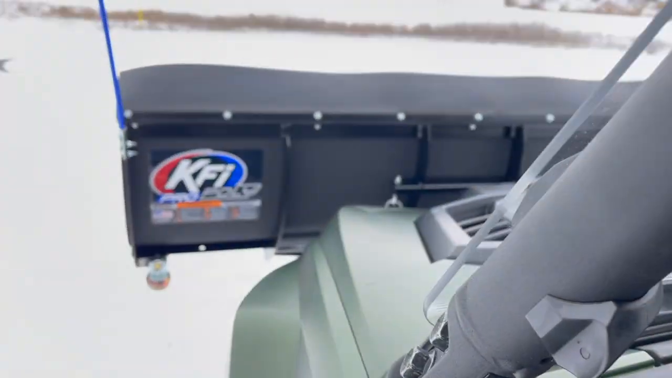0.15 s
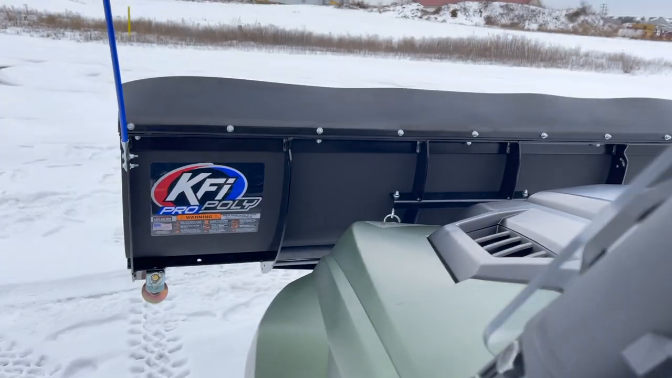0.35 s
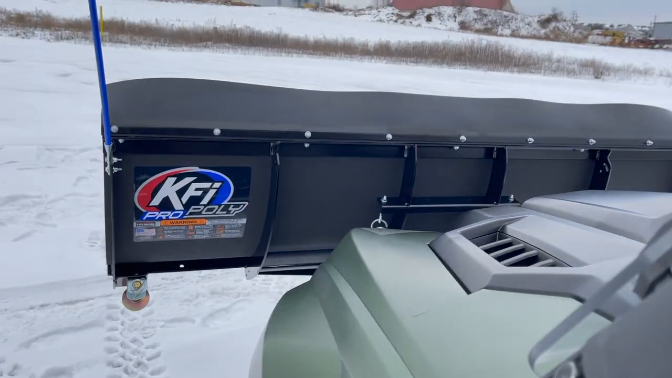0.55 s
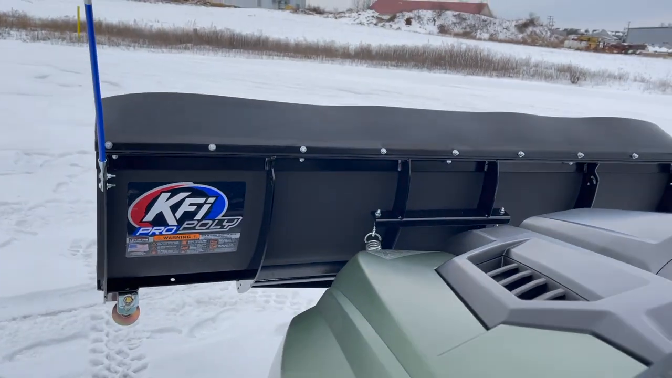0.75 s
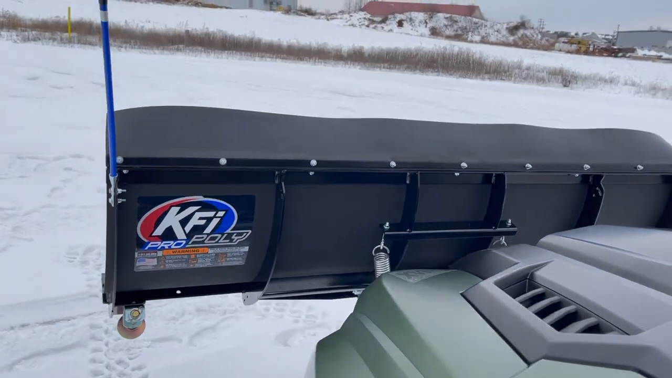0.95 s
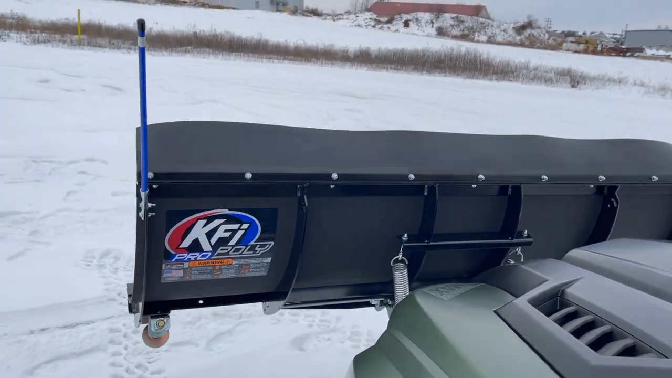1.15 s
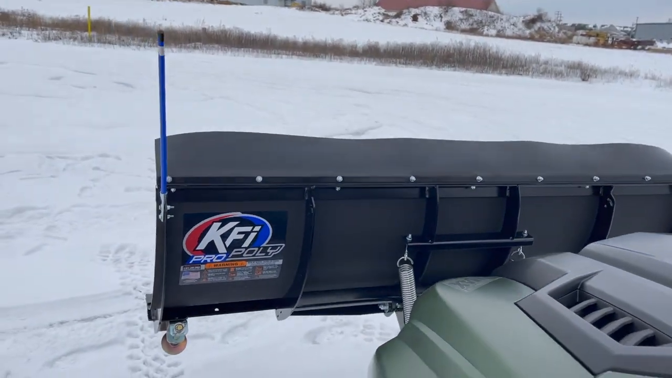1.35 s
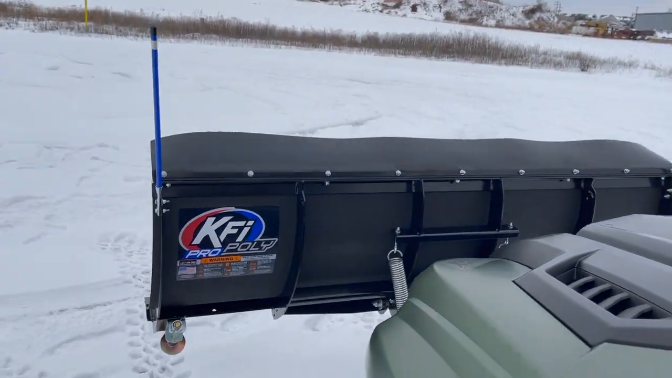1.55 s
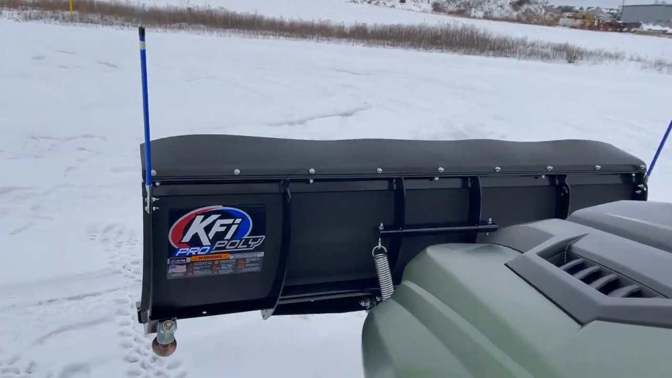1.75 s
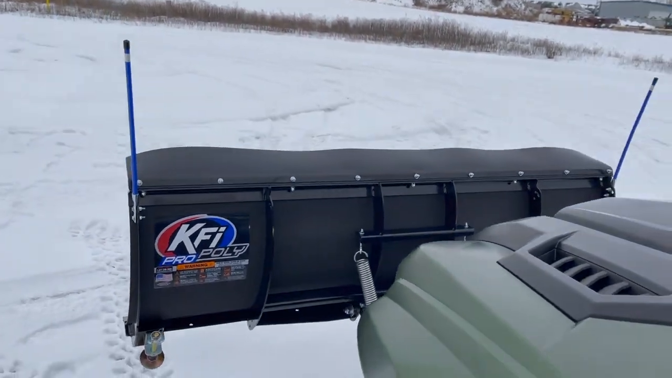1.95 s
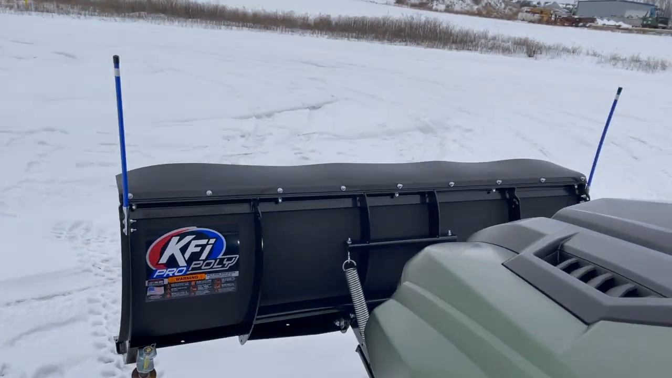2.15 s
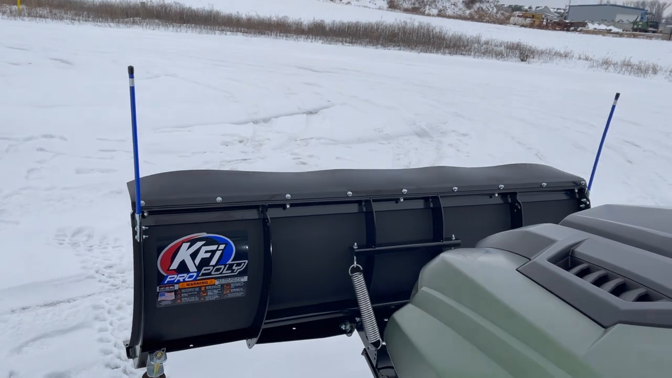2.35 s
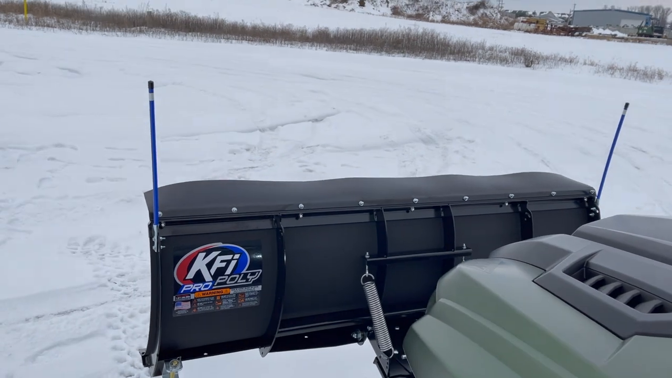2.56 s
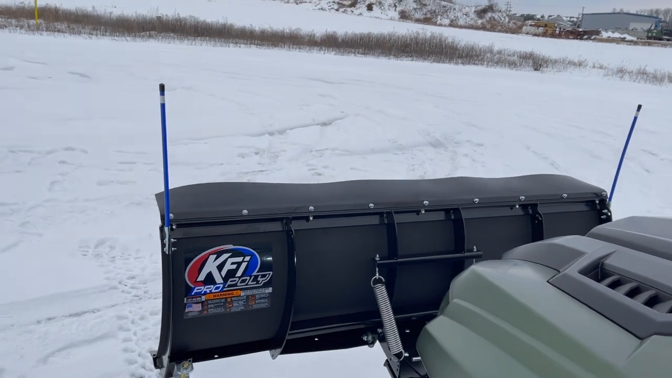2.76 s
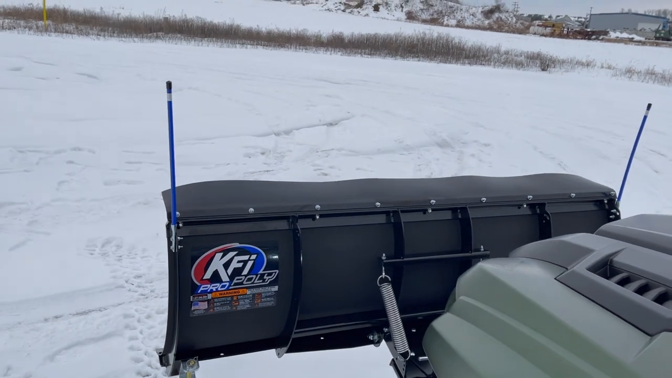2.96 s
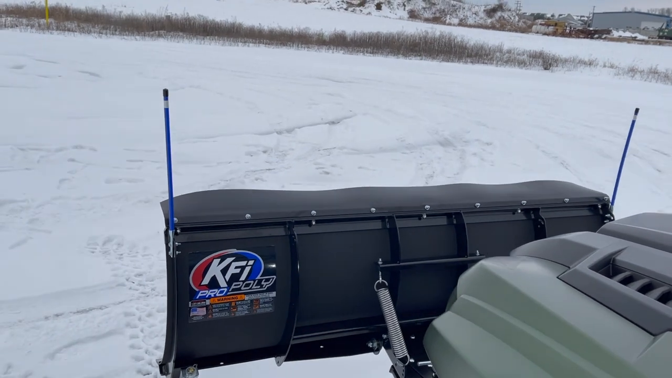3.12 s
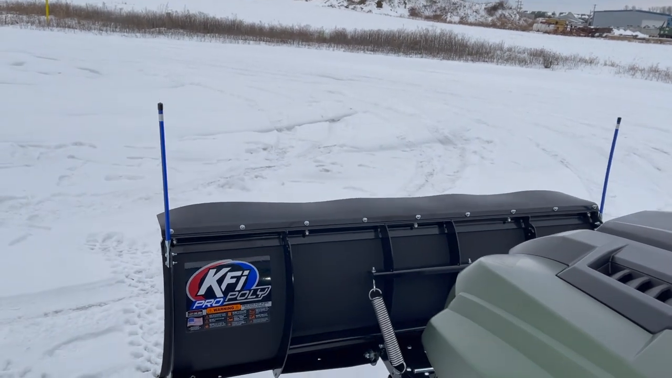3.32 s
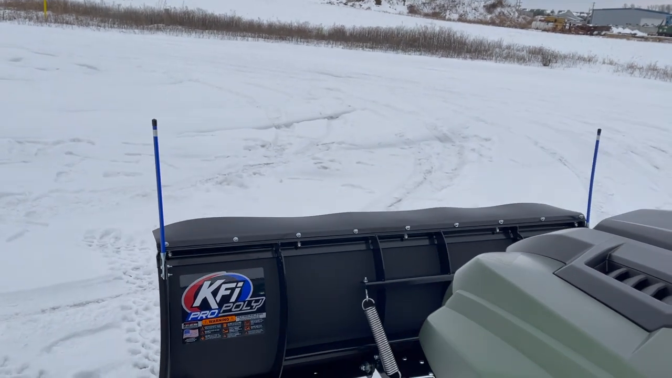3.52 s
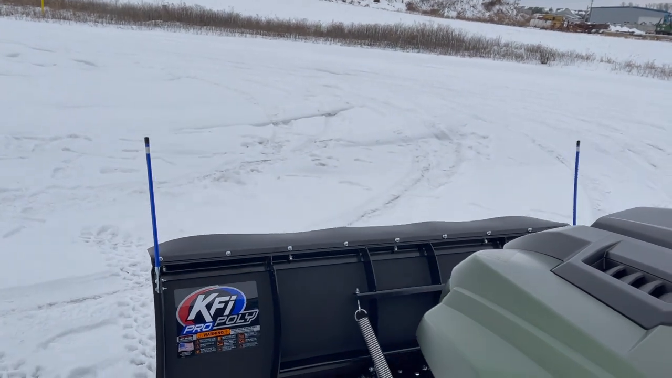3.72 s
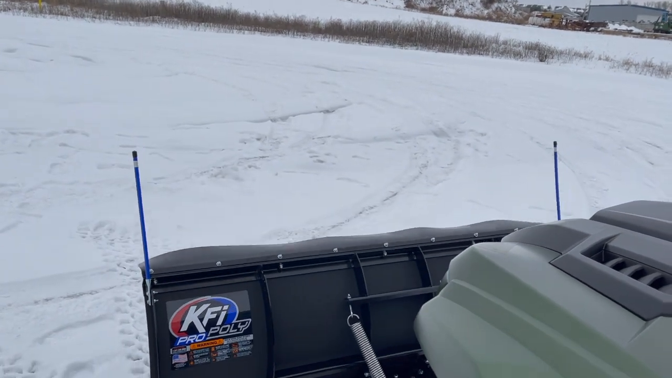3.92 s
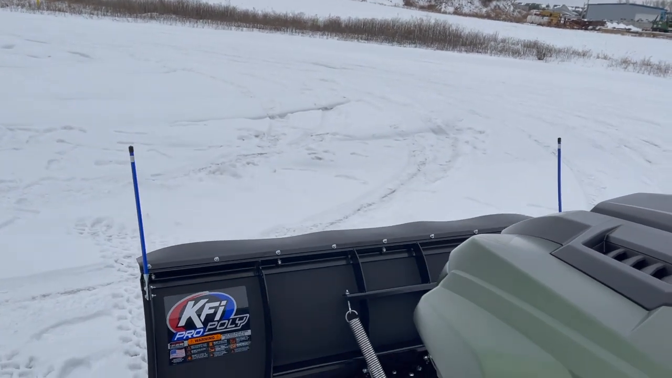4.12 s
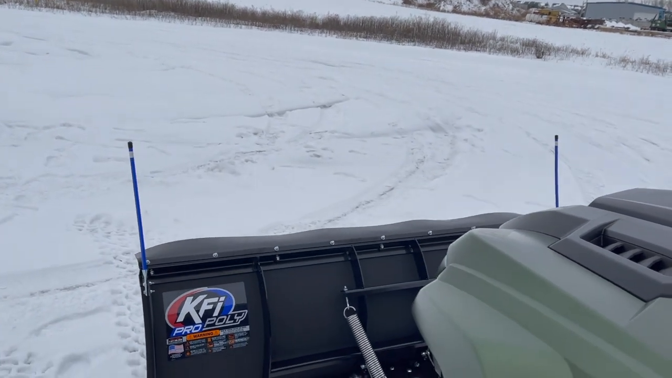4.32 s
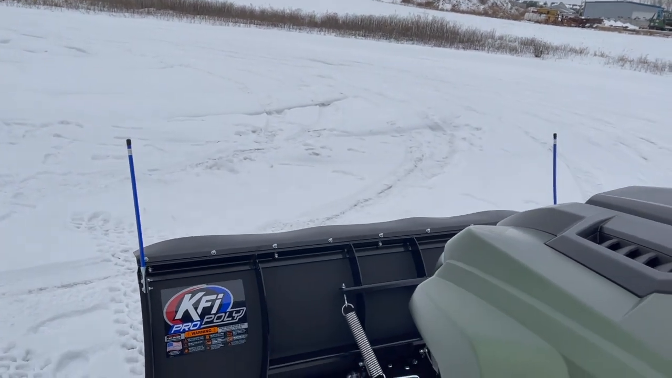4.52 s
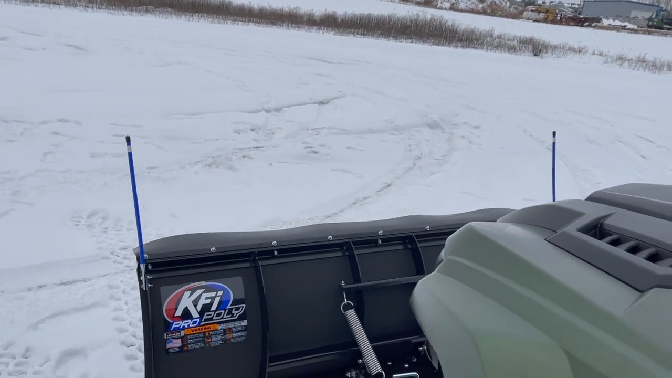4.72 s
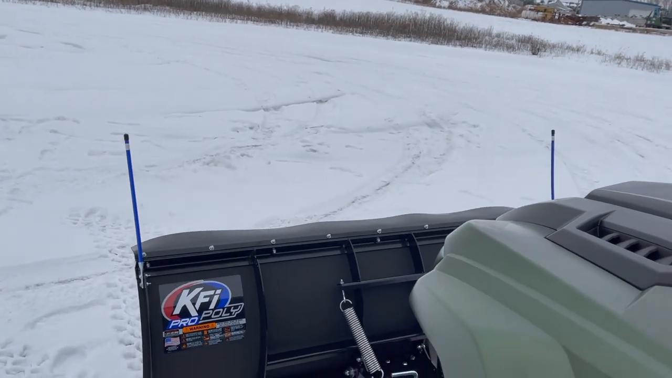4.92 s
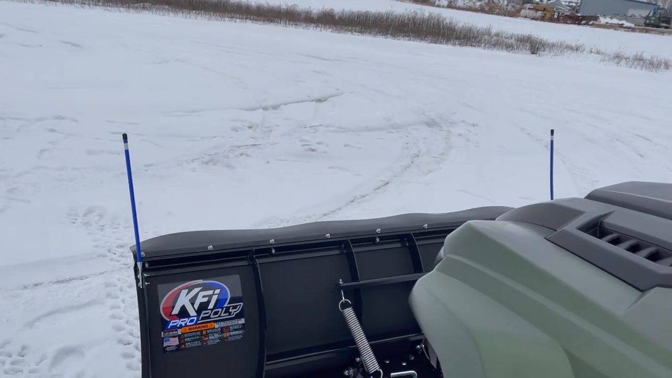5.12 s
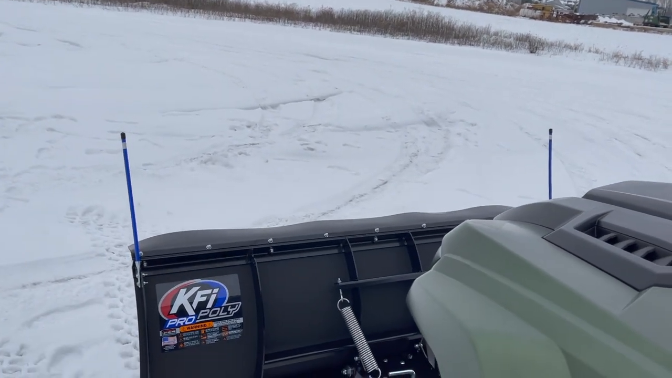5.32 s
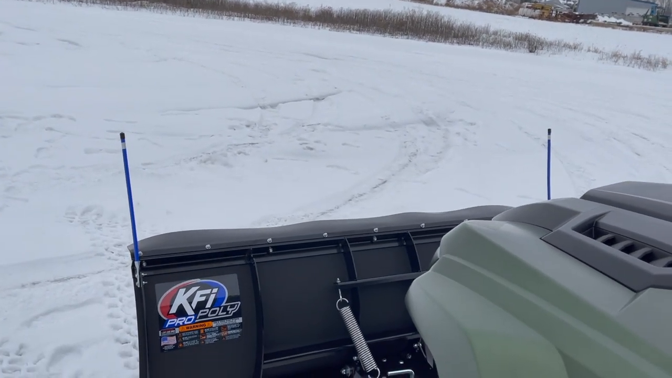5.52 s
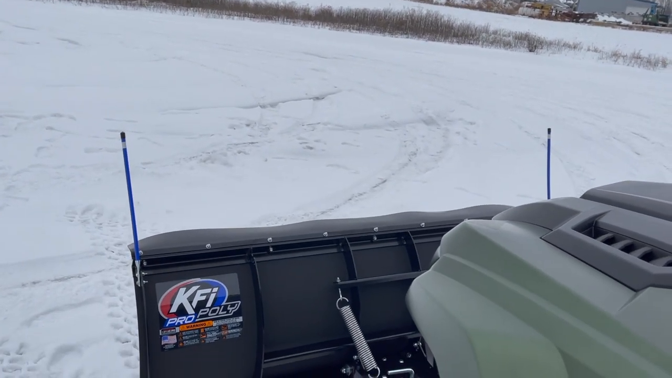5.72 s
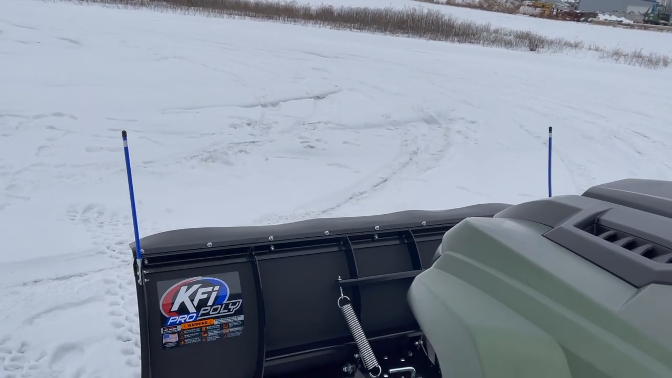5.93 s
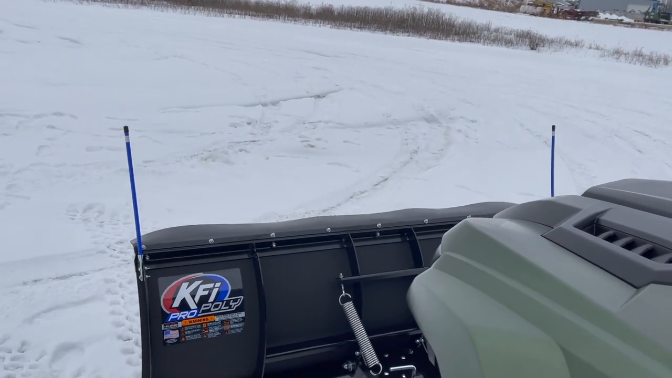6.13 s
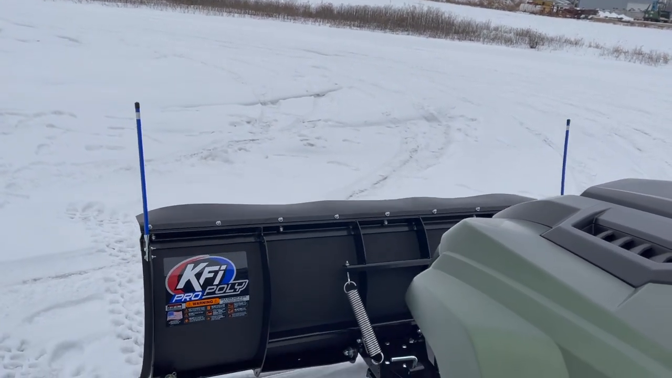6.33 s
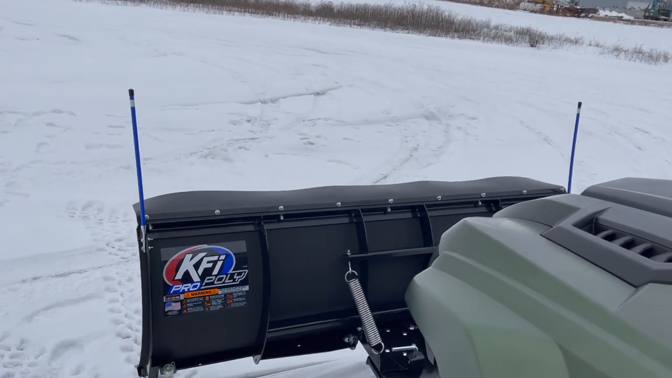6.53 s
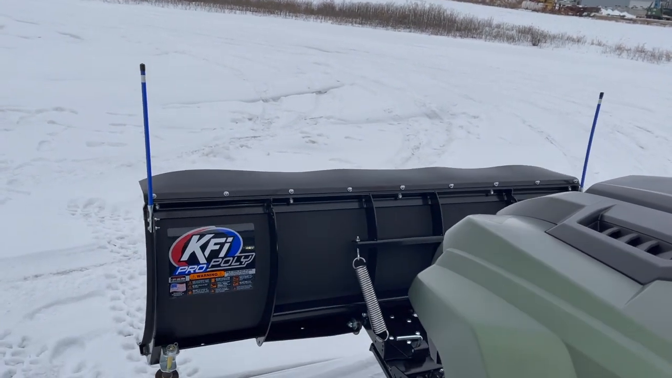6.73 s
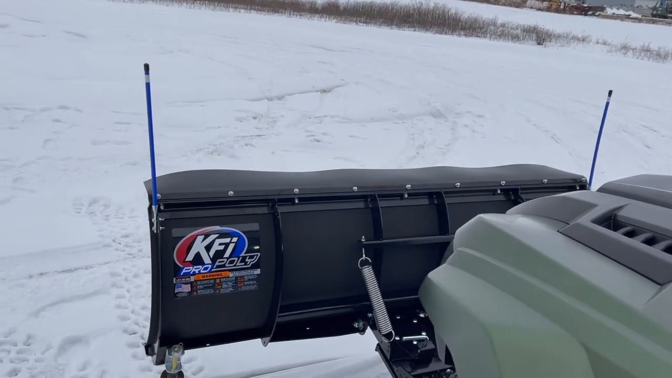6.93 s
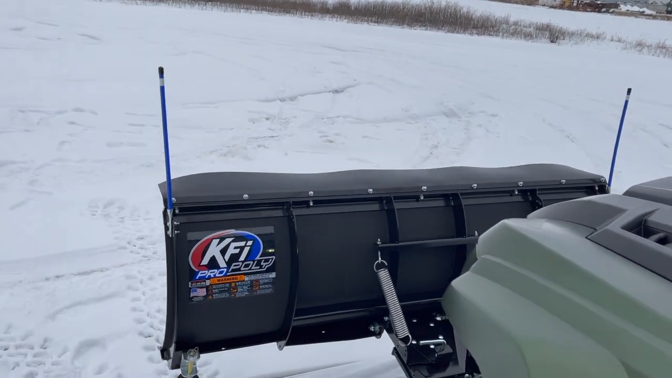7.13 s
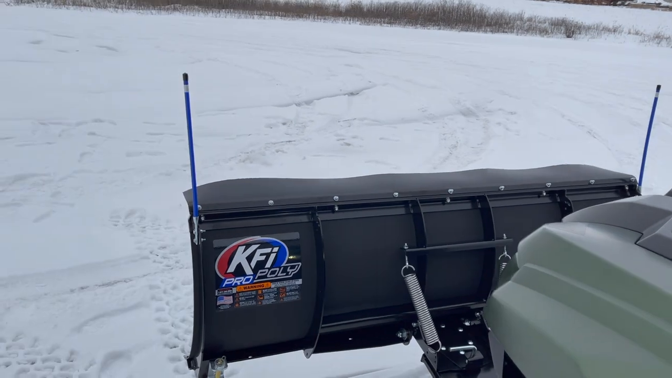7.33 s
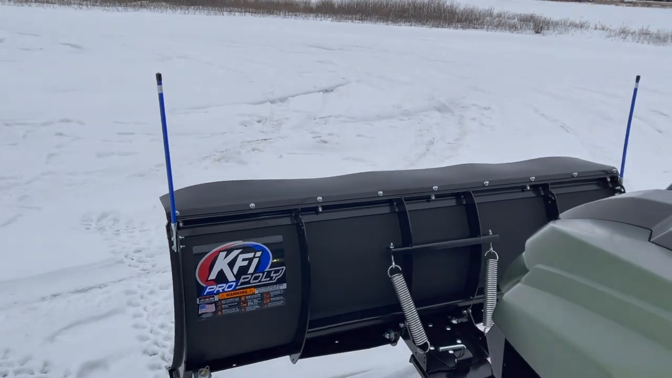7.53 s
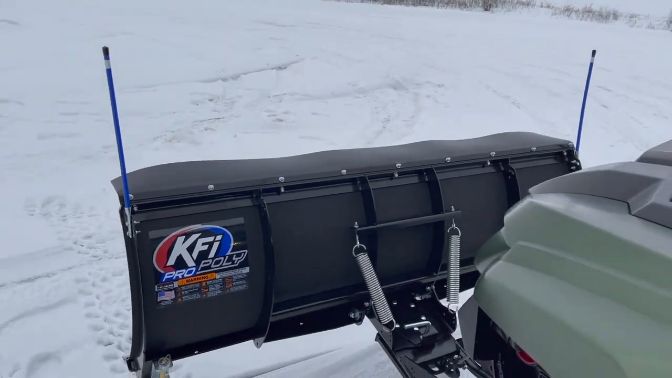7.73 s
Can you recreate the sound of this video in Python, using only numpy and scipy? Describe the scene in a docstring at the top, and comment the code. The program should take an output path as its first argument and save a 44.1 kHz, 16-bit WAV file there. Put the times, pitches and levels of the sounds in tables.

```python
"""Clacks, a whining and grinding winch and heavy bangs: an electric winch on a utility vehicle lowers
a snow plow in two bursts, then lifts it, heard from the cab. The motor is sine orders of its shaft and
gear mesh over modulated noise; the blade is noise bursts ringing steel modes; the coil springs are
slowly decaying sines and noise. Swaying scrapes follow; a rustling jacket and light wind lie underneath."""
import sys
import numpy as np
from scipy import signal
from scipy.fft import rfft, irfft, next_fast_len
from scipy.io import wavfile
from scipy.ndimage import uniform_filter1d, map_coordinates

SR = 44100
rng = np.random.default_rng(int(sys.argv[2]) if len(sys.argv) > 2 else 0)


def inscribe(sig):
    """Save sig as 16-bit PCM at rate SR to the path in sys.argv[1].

    A 1-D sig is mono; a 2-D sig holds one channel per row.
    Samples are clipped to [-1, 1] before scaling.
    """
    pcm = np.round(np.clip(np.atleast_2d(sig).T, -1, 1) * 32767)
    wavfile.write(sys.argv[1], SR, pcm.astype(np.int16))


N = 347067

# motor runs, two down and one up: [switch on t/s, switch off t/s, clack level/dB]
RUNS = [(1.068, 2.12, -20), (2.972, 3.808, -31), (5.991, 6.744, -24)]
MOTOR_LAG_S = 0.02  # switch-on to motor fed
SLOWING_PER_S = 6.2  # decay rate of speed after switch-off

# shaft orders, lowering: [multiple of shaft speed, level/dB]
ORDERS_DOWN = [(1, -39), (1.72, -41.5), (2, -52), (3, -45.5), (3.48, -45), (5.42, -46), (8.38, -47),
               (8.9, -47.5), (12, -49), (16.3, -51.5)]
# lowering runs: [full-speed whine f/Hz, whine level/dB, first swell t/s, fraying/(rad/s^2),
# hum and grinding level/dB, their growth/(dB/s)]
LOWERINGS = [(2286, -35, 1.353, .4, 1, -0.5), (2271, -42, 3.17, 10, -1, 1.5)]
LOWERING_SPEED_LACK, LOWERING_SPIN_UP_S = 0.48, 0.051  # share missing when fed, time constant
DRUM_HZ, SWELL_DB, WHINE_FADE_DB_PER_S = 2.66, 5, 6.5
SQUEAK_DB, SQUEAK_LAG_S, SQUEAK_HALF_WIDTH_S = 12.5, 0.016, 0.006  # as the brake bites


def lowering():
    """Unloaded motor runs up to a steady speed; its whine swells per drum turn, frays as the cable slackens."""
    out = np.zeros((2, N))
    for (on, off, _), row in zip(RUNS, LOWERINGS):
        full_hz, whine_db, swell_s, fray, grind_db, growth = row
        age = np.clip(clock() - on, 0, off - on)
        pace = speed(on, off, LOWERING_SPEED_LACK, LOWERING_SPIN_UP_S)
        whine = turning(full_hz * pace)
        shaft = whine / 28.3
        whine = whine + fray * age ** 2 * wobble(110)

        swell_db = SWELL_DB * np.cos(2 * np.pi * DRUM_HZ * (clock() - swell_s))
        swell_db -= WHINE_FADE_DB_PER_S * age
        swell_db += SQUEAK_DB * bump(off + SQUEAK_LAG_S, SQUEAK_HALF_WIDTH_S)
        partials = np.sin(whine + 0.205 * wobble(58))
        partials += amp(-25.0) * np.sin(2 * whine)
        partials += amp(-16.0) * np.sin(whine - shaft + wobble(27))  # shaft sideband
        tone = np.sqrt(2) * amp(whine_db + swell_db) * pace ** 4 * partials

        hum = pace ** 5 * lines(shaft, ORDERS_DOWN, slip=0.27, slip_rate=11, flutter_db=2.5)
        grind = grinding(on, shaft, growl_db=-2, hiss_db=4.5, throb=0.056, grain_db=1.0)
        rough = amp(grind_db + growth * age) * (hum + grind)
        out += powered(on, off, coast=0.052) * (tone + rough)
    return out


# shaft orders, lifting: [multiple of shaft speed, level/dB]
ORDERS_UP = [(1.5, -43), (2, -59), (3, -46.5), (5.33, -50), (6, -43.5), (7.8, -41), (8.22, -45),
             (9.75, -45.5), (13.3, -49), (15.6, -45.5)]
# overtones of the loaded gear mesh: [multiple of mesh rate, level/dB]
MESH_TONES = [(2, -39), (3, -41.5), (4, -53), (5, -51), (6, -47), (7, -47), (8, -51), (9, -52.5),
              (10, -51.5), (11, -56.5)]
# overtones that ring out in turn as the load shifts: [t/s, half width/s, multiple of mesh rate, level/dB]
OVERTONES = [(6.065, 0.014, 3, -35), (6.34, 0.19, 4, -43.5), (6.595, 0.042, 3, -37.5), (6.62, .05, 7, -47),
             (6.69, 0.034, 6, -42)]
LIFTING_SPEED_LACK, LIFTING_SPIN_UP_S = 0.27, 0.033  # share missing when fed, time constant
NOMINAL_MESH_HZ = 595
LOAD_S, LOAD_HALF_WIDTH_S, LOAD_SAG = 6.35, 0.091, 0.018  # cable takes the weight; sag as share of speed
RECOVERY_PER_S = 0.027  # speed share regained as the blade rises
SLACK_TONE_DB, LOADED_TONE_DB, BUZZ_DB = -53.5, -33.5, 0.5
GROWL_EASING_DB, TREBLE_EASING_DB = 5, 1  # drops under load; treble: buzz and hiss


def lifting():
    """Blade weight slows the motor; the rough mesh buzz gains a clean, slowly rising tone as the load settles."""
    on, off, _ = RUNS[-1]
    sag = LOAD_SAG * bump(LOAD_S, LOAD_HALF_WIDTH_S)
    recovery = RECOVERY_PER_S * np.maximum(clock() - LOAD_S, 0)
    pace = speed(on, off, LIFTING_SPEED_LACK, LIFTING_SPIN_UP_S) * (1 - sag + recovery)
    load = (1 + np.tanh((clock() - LOAD_S) / LOAD_HALF_WIDTH_S)) / 2
    mesh = turning(NOMINAL_MESH_HZ * pace)
    shaft = mesh / 8

    clean_db = SLACK_TONE_DB + load * (LOADED_TONE_DB - SLACK_TONE_DB)
    tone = sine(clean_db, 2 * mesh + 0.13 * wobble(62))
    overtones = sum(bump(s, width) * sine(db, k * mesh + 0.7 * wobble(80)) for s, width, k, db in OVERTONES)
    hum = lines(shaft, ORDERS_UP, slip=0.32, slip_rate=11, flutter_db=1.5)

    cable_tug = amp(0.99 * wobble(45))  # winding onto the drum
    eccentric = 1 + 0.3 * np.sin(shaft + wobble(30))  # teeth bite harder once a turn
    buzz = eccentric * lines(mesh, MESH_TONES, slip=1.3, slip_rate=150, flutter_db=3.5)
    buzz = amp(BUZZ_DB - TREBLE_EASING_DB * load) * pace ** 6 * buzz
    growl_db = -0.5 - GROWL_EASING_DB * load
    hiss_db = 3.5 - TREBLE_EASING_DB * load
    grind = grinding(on, shaft, growl_db, hiss_db, throb=0.051, grain_db=0.0)
    return powered(on, off, coast=0.013) * (tone + overtones + hum + cable_tug * (buzz + grind))


# winch noise colours: [f/Hz, spectral level/dB]
GROWL = [(45, -36.5), (100, 1), (200, 4), (320, -1), (450, 0.5), (580, -2), (750, -2), (1100, -3.5),
         (1500, -8), (2200, -20), (4000, -65)]
HISS = [(900, -24), (1800, 3.5), (2700, 1), (3300, -1.5), (4000, -3), (4600, -3.5), (5800, -2), (6600, -6),
        (8000, -7), (9500, -2.5), (11000, 3), (12100, -5.5), (12700, -23), (13600, -60)]
# winch housing resonances: [f/Hz, width/Hz, lift/dB]
HOUSING = [(677, 40, 5.3), (940, 9.2, 2.7), (2594, 150, 2.7), (2913, 160, 3.3), (3600, 140, 5.7),
           (4380, 130, 3.8)]
# grinding surges where the cable drags on the drum: [t/s, half width/s, level/dB]
SURGES = [(3.159, 0.029, 3.5), (3.49, .025, 2), (3.68, 0.069, 3), (6.27, 0.014, 0.5)]
GROWL_BASE_DB, HISS_BASE_DB = -27.5, -40
START_DB, BUILD_S = -3, 0.17  # offset at switch-on, its Gaussian recovery


def grinding(on, shaft, growl_db, hiss_db, throb, grain_db):
    """Gear teeth and brushes rub in the housing, building up after the start, unevenly over each turn."""
    build_db = START_DB * np.exp(-(np.maximum(clock() - on, 0) / BUILD_S) ** 2)
    build_db += sum(db * bump(s, width) for s, width, db in SURGES)
    teeth = unit((1 + throb * np.sin(shaft)) * amp(grain_db * wobble(500)))
    growl = patchy(noise(GROWL, HOUSING, ripple_db=3.5, ripple_hz=20), depth_db=2.5)
    growl = amp(GROWL_BASE_DB + growl_db + build_db + 0.82 * wobble(25)) * growl
    hiss = patchy(noise(HISS, HOUSING, ripple_db=3.5), depth_db=3.0)
    hiss = amp(HISS_BASE_DB + hiss_db + 0.95 * build_db) * hiss
    return teeth * (growl + hiss)


def lines(angle, orders, slip, slip_rate, flutter_db):
    """Multiples of a rotation; backlash shakes the phase and size of each."""
    return sum(sine(db + flutter_db * wobble(18), k * angle + slip * wobble(slip_rate)) for k, db in orders)


def speed(on, off, lack, spin_up_s):
    """Share of full speed: exponential run-up once fed, braked exponentially after switch-off."""
    age = np.maximum(clock() - on - MOTOR_LAG_S, 0)
    run_up = 1 - lack * np.exp(-age / spin_up_s)
    return run_up * np.exp(-SLOWING_PER_S * np.maximum(clock() - off, 0))


def powered(on, off, rise=0.0039, coast=0.018):
    """Motor gate: ramps to 1 once fed, back to 0 over the coast after switch-off."""
    fed = on + MOTOR_LAG_S
    return np.interp(clock(), [fed, fed + rise, off, off + coast], [0, 1, 1, 0])


def turning(hz):
    """Angle/rad of something that turns at a changing rate."""
    return 2 * np.pi * np.cumsum(hz) / SR


# clack colour: [f/Hz, spectral level/dB]
CLACK = [(200, -3), (1100, 4), (2000, 1), (3600, -1), (6000, -2.5), (8000, -5), (11000, 2), (12500, -12),
         (14000, -34), (16000, -34)]
TICK_DB, BRAKE_LAG_S, CLACK_S = -34, 0.014, 0.015


def contactor():
    """Contacts snap shut with a tick, then the brake lets go with a bright clack: noise bursts in the housing."""
    snaps = []
    for on, _, clack_db in RUNS:
        snaps += [(on, TICK_DB), (on + BRAKE_LAG_S, clack_db)]
    env = sum(amp(db) * burst(s, CLACK_S, rise=0.002, t60=0.045) for s, db in snaps)
    return env * unit(amp(1.4 * wobble(600))) * noise(CLACK, HOUSING)


# blade and linkage: [t/s, thud level/dB, clank level/dB, bright edge level/dB, contact length/s]
KNOCKS = [(1.144, -24, -47, -84, 0.0062), (1.917, -27, -34.5, -46, 0.003),
          (2.121, -29.5, -30.5, -36.5, 0.011), (2.168, -27.5, -28.5, -46, 0.0096),
          (2.221, -23, -34, -68, 0.0094), (2.239, -24, -31.5, -39.5, 0.011),
          (2.257, -24.5, -31, -35, 0.0113), (2.359, -31, -35, -55, 0.0041), (2.423, -30, -38, -60, 0.0033),
          (2.527, -38.5, -39, -62, 0.006), (2.597, -35.5, -47.5, -75, 0.0041),
          (2.736, -39, -50, -88, 0.013), (2.783, -46, -65, -77, 0.037), (2.866, -47, -66, -74, 0.011),
          (3.795, -16, -22, -23, 0.03), (3.837, -25.5, -32, -33.5, 0.031), (3.876, -12, -21, -19.5, 0.018),
          (3.963, -30.5, -33.5, -38, 0.03), (4.034, -28, -36.5, -52.5, 0.0071),
          (4.052, -29.5, -36, -38.5, 0.0095), (4.15, -38.5, -49.5, -41.5, .006),
          (4.177, -38.5, -48.5, -64, 0.0054), (4.238, -49.5, -65, -61.5, 0.033),
          (4.368, -55, -69, -60.5, .003), (4.445, -50, -65, -81.5, .005),
          (6.738, -29.5, -34.5, -39.5, 0.019), (6.795, -21.5, -32, -37, .016),
          (6.859, -27.5, -30.5, -45, 0.0036), (6.896, -27, -41, -76, 0.0064),
          (6.961, -35.5, -42, -56, 0.0085), (7.026, -39, -42, -60, 0.0041),
          (7.122, -33, -47, -74.5, 0.0045), (7.166, -45.5, -62, -87, 0.0036),
          (7.27, -40.5, -69, -86, 0.0098), (7.441, -42, -66, -66, 0.0042), (7.485, -49, -59, -60, 0.0016),
          (7.505, -39, -49.5, -67, 0.0012), (7.653, -54, -54, -62, 0.0021),
          (7.754, -51, -60, -59.5, 0.0029)]
# colours of thud, clank and bright edge: [f/Hz, spectral level/dB]
THUD = [(30, -26.5), (60, 2.5), (110, 5.5), (180, 5.5), (260, -2.5), (400, -1), (560, -1.5), (750, -5),
        (1100, -7.5), (1500, -14), (3000, -61)]
CLANK = [(600, -8), (1300, 12), (2000, 8.5), (2700, 8), (3800, 4), (5200, -10.5), (6200, -17.5),
         (8000, -22.5), (12000, -45.5)]
EDGE = [(2500, -19), (5000, 6), (6200, -3), (8000, -4), (9200, 1), (11200, 2.5), (12300, -14.5),
        (13500, -31.5), (15500, -48)]


def blade():
    """Knocks thud through the blade and clank in the mount: noise bursts, metal colours redrawn per knock."""
    knocks = KNOCKS + rattles()
    thud_power, metal = np.zeros(N), np.zeros((2, N))
    for s, thud_db, clank_db, edge_db, length in knocks:
        start = round(s * SR)
        span = slice(start, start + SR // 2)
        hit = burst(s, length, rise=0.0007, t60=0.055)[span]
        tail = burst(s, length, rise=0.004, t60=0.29)[span]
        contact = np.hypot(hit, amp(-14) * tail)
        size = len(contact)
        clank = amp(clank_db) * noise(CLANK, ripple_db=3.5, ripple_hz=80.5, size=size)
        edge = amp(edge_db) * noise(EDGE, ripple_db=5.5, ripple_hz=162.9, size=size)
        metal[:, span] += contact * (clank + edge)
        thud_power += (amp(thud_db) * burst(s, length, rise=0.0011, t60=0.2)) ** 2
    # f/Hz, width/Hz, lift/dB
    resonances = [(204.0, 43, 1.8), (450, 49, 1.4), (690, 170, 3.8), (983, 77, 7.5), (1190, 170, 6)]
    body = unit(amp(2.2 * wobble(250))) * np.sqrt(thud_power) * noise(THUD, resonances)
    return body + unit(amp(2.2 * wobble(450))) * metal + amp(-10.5) * ringing(knocks)


# steel mount modes: [f/Hz, relative level/dB, t60/s]
STEEL = [(376.7, 1.5, 0.229), (998, 8.5, 0.1), (1740, 4.5, 0.089), (2600, -7.5, 0.23), (3120, -3.5, .16),
         (3930, -11.5, 0.12), (4440, -10, .15), (4737, -12, 0.15), (5000, -8.5, 0.077), (5880, -11.5, .09),
         (6760, -6, 0.22), (8231, -13.5, .28), (8500, -1.5, .09), (11200, 2.5, 0.097)]


def ringing(knocks, scatter_db=5.0, detune=0.0021):
    """Knocks ring the steel at random strengths: thud the low modes, clank the middle, edge the top."""
    out, t = np.zeros(N + SR), np.arange(SR // 2) / SR
    hz, level, t60 = np.transpose(STEEL)[..., None]
    fade = amp(level - 60 * t / t60) * (1 - np.exp(-t / 0.013))
    for s, thud_db, clank_db, edge_db, _ in knocks:
        size, shift, phase = rng.standard_normal((3, len(STEEL), 1))
        db = np.select([hz < 800, hz < 6200], [thud_db, clank_db], edge_db)
        wave = np.sin(2 * np.pi * (hz * (1 + detune * shift) * t + phase))
        modes = amp(db + scatter_db * size) * fade * wave
        out[round(s * SR):][:len(t)] += modes.sum(0)
    return out[:N]


MEDIAN_GAP_S, RATTLE_S = 0.095, 0.002
RATTLE_DB, RATTLE_FADE_DB_PER_S = -50, 9.5
RATTLE_CLANK_DB, RATTLE_EDGE_DB = -9, -17  # re thud


def rattles(count=12):
    """Loose pins tick at uneven gaps from each sway's start, softer on average with time; rows like KNOCKS."""
    rows = []
    for s, *_ in SWAYS:
        gap, size, bright = rng.standard_normal((count, 3)).T
        ages = np.cumsum(MEDIAN_GAP_S * np.exp(0.44 * gap))
        levels = RATTLE_DB - RATTLE_FADE_DB_PER_S * ages + 3 * size
        for age, db, b in zip(ages, levels, bright):
            edge_db = db + RATTLE_EDGE_DB + 3.6 * b
            rows.append((s + age, db, db + RATTLE_CLANK_DB, edge_db, RATTLE_S))
    return [row for row in rows if row[0] < N / SR - 0.05]


# blade brought up short by the cable or the ground: [t/s, thunk level/dB, thunk f/Hz, boom level/dB]
THUNKS = [(2.245, -12, 407, -35.5), (3.798, -11.5, 748.5, -48.5), (3.881, -11, 170, -45),
          (6.791, -22.5, 314, -52)]
BOOM_HZ, BOOM_HOLD_S = 70.2, 0.35


def cable():
    """Blade stops dead: a short decaying sine thunks in the panel, a slower low one booms in the frame."""
    turn = 2 * np.pi * clock()
    thunk, boom = np.zeros(N), np.zeros(N)
    for s, thunk_db, hz, boom_db in THUNKS:
        thunk += amp(thunk_db) * burst(s, 0.004, rise=0.0018, t60=0.076) * np.sin(hz * turn)
        boom += amp(boom_db) * burst(s, BOOM_HOLD_S, rise=0.014, t60=0.65)
    return thunk + boom * amp(3.8 * wobble(15)) * np.sin(BOOM_HZ * turn + 0.29 * wobble(19))


# clear coil spring modes: [f/Hz, relative level/dB, t60/s]
SPRINGS = [(160, -1, 8.1), (203.2, 8, 3.5), (235, -5.5, 8.8), (286, -12.5, 9), (317, -12.5, 7.13),
           (391, 0.5, 5.4), (440, -2.5, 4.6), (495, -14, 4.5), (511, 4, 2.2), (563, -10.5, 2.2),
           (654, -8, 8), (740, 2.5, 3.2), (780, -7, 5.6), (1030, -6.5, 3), (2770, -26.5, 1.6),
           (3300, -17.5, 1.2)]
# jolts that set the springs humming: [t/s, clear modes level/dB, dense shimmer level/dB]
JOLTS = [(2.245, -51, -36.5), (3.85, -43.5, -32.5), (6.801, -53.5, -40)]
# dense spring modes, colour: [f/Hz, spectral level/dB]
SHIMMER = [(45, -18.5), (100, 7.5), (220, 1), (300, -4.5), (420, -0.5), (600, -5), (800, -7), (1020, -15),
           (1150, -24), (1400, -10.5), (3000, -33), (9000, -49.5)]
# dense spring modes, decay: [f/Hz, t60/s]
SHIMMER_T60 = [(100, 3.4), (600, 4.66), (1000, 5.8), (1200, 1.1), (3000, 1.7), (8000, .8)]
SPRING_WAVER_RAD = 0.4  # phase waver of the swaying springs


def springs():
    """Jolted coil springs hum: decaying sines over a dense noise shimmer; the treble dies first."""
    out = np.zeros((2, N))
    for s, modes_db, shimmer_db in JOLTS:
        start = round(s * SR)
        t = clock()[:N - start]
        ring = np.zeros(len(t))
        for mode_hz, db, t60 in SPRINGS:
            angle = 2 * np.pi * (mode_hz * t + rng.random()) + SPRING_WAVER_RAD * wobble(9)[start:]
            ring += sine(db - 60 * t / t60, angle)
        hz, age, bands = signal.stft(noise(SHIMMER), SR, nperseg=512)
        decay = amp(-60 * age / along(SHIMMER_T60, hz)[:, None])
        shimmer = signal.istft(bands * decay, SR, nperseg=512)[1][:, :len(t)]
        onset = 1 - np.exp(-t / 0.0055)
        out[:, start:] += onset * (amp(modes_db) * ring + amp(shimmer_db) * shimmer)
    return out


# blade sways after a stop: [start t/s, end t/s, level/dB]
SWAYS = [(2.254, 3.004, -36.5), (6.813, 7.877, -37.5)]
SWAY_RISE_S, SWAY_FADE_S, SWAY_POWER = 0.016, 0.19, 1.67  # dies as a power of time


def scraping():
    """Hanging blade sways: pins grate as jittery noise, the panel drones with them as low noise."""
    # f/Hz, spectral level/dB
    grate_colour = [(700, -19.0), (1100, 5.5), (1600, 7.5), (3000, -4.5), (5000, -22), (8000, -36),
                    (12000, -46.0)]
    drone_colour = [(200, -1), (380, 8.0), (560, 13.0), (700, -13), (1000, -46), (1500, -51.5)]
    grating = unit(amp(3.2 * wobble(200) + 0.83 * wobble(30))) * noise(grate_colour)
    drone = noise(drone_colour)
    sway = np.zeros(N)
    for start, end, db in SWAYS:
        age = np.maximum(clock() - start, 0)
        fade = (1 + age / SWAY_FADE_S) ** SWAY_POWER
        sway += amp(db) * burst(start, end - start, rise=SWAY_RISE_S, t60=0.2) / fade
    return sway * (amp(-7.0) * grating + amp(10.0) * drone)


# jacket strokes: [t/s, level/dB, length/s]
RUSTLES = [(0, -75.5, 1.44), (0.065, -60.5, 0.15), (0.236, -69, 0.15), (0.413, -54.5, 0.029),
           (0.507, -63.5, 0.168), (7.404, -61.5, 0.33)]
# cloth colour: [f/Hz, spectral level/dB]
CLOTH = [(500, 2), (1000, 3.5), (1300, -0.5), (1700, 1.5), (2300, -3), (2700, -11), (3500, -11),
         (5000, -18.5), (8000, -19.5), (11000, -12), (13000, -45)]
# cloth resonances: [f/Hz, width/Hz, lift/dB]
CLOTH_PEAKS = [(1290, 130, 10), (2310, 300, -2), (4820, 450, 6.5)]
RUSTLE_RISE_S, RUSTLE_T60_S = 0.0043, 0.18


def jacket():
    """Cloth rubs close by in scratchy strokes: patchy noise with a jittery level."""
    strokes = sum(amp(db) * burst(s, length, RUSTLE_RISE_S, RUSTLE_T60_S) for s, db, length in RUSTLES)
    scratch = unit(amp(1.3 * wobble(200) + 1.5 * wobble(30)))
    return strokes * scratch * patchy(noise(CLOTH, CLOTH_PEAKS), depth_db=2.5)


# colours of the wind rumble and faint outdoor hiss: [f/Hz, spectral level/dB]
RUMBLE = [(20, -17.5), (35, -6.5), (55, 0.5), (85, -2.5), (120, -10.5), (170, -18), (300, -25), (500, -36),
          (1000, -45), (1400, -53), (2400, -74.5)]
AIR = [(500, 0), (1500, -9), (3000, -15), (9000, -16), (12000, -19), (15000, -32)]
WIND_DB, GUST_S, GUST_HALF_WIDTH_S, GUST_DB = -46, 5.5, 0.33, 7


def wind():
    """Light, lumpy low noise with one small gust, and a trace of hiss."""
    level = amp(WIND_DB + GUST_DB * bump(GUST_S, GUST_HALF_WIDTH_S))
    rumble = level * unit(amp(1.2 * wobble(12))) * noise(RUMBLE)
    return rumble + amp(-82) * noise(AIR)


def amp(db):
    """Amplitude ratio of a level/dB."""
    return 10 ** (np.asarray(db) / 20)


def unit(x):
    """x scaled to rms 1."""
    return x / np.sqrt(np.mean(x ** 2) + 1e-20)


def sine(rms_db, angle):
    """Sine of a given rms level."""
    return np.sqrt(2) * amp(rms_db) * np.sin(angle)


def along(points, hz):
    """(f/Hz, value) points interpolated on a log axis."""
    f, v = np.transpose(points)
    return np.interp(np.log(hz + 1), np.log(f + 1), v)


def clock():
    """Time/s of every sample."""
    return np.arange(N) / SR


def bump(centre, half_width):
    """Bell curve in time: 1 at its centre, 1/e at the half width."""
    return np.exp(-((clock() - centre) / half_width) ** 2)


def wobble(rate):
    """Smooth random curve, rate knots a second."""
    knots = rng.standard_normal(int(N * rate / SR) + 4)
    coarse = np.arange(0, N + 16, 16)
    return np.interp(np.arange(N), coarse, map_coordinates(knots, [coarse * rate / SR]))


def burst(start, length, rise, t60):
    """Contact envelope: rises, holds for its length, decays exponentially."""
    env = np.zeros(N + 2 * SR)
    t = np.arange(2 * SR) / SR
    decay = amp(-60 * np.maximum(t - length, 0) / t60)
    env[max(round(start * SR), 0):][:len(t)] = (1 - np.exp(-t / rise)) * decay
    return env[:N]


def filtered(x, response):
    """x times a complex response of frequency."""
    n = x.shape[-1]
    m = next_fast_len(n + n // 16)
    return irfft(rfft(x, m) * response(np.fft.rfftfreq(m, 1 / SR)), m)[..., :n]


# left-right likeness of noise: [f/Hz, correlation]
ALIKE = [(100, 0.95), (400, 0.81), (2000, 0.75), (9000, 0.96)]


def noise(spectrum, resonances=(), ripple_db=0, ripple_hz=45, size=N):
    """Stereo noise of rms 1: a smooth colour, its main resonances and a random ripple of lesser ones."""
    def colour(hz):
        db = along(spectrum, hz)
        for centre, width, lift in resonances:
            db = db + lift / (1 + (2 * (hz - centre) / width) ** 2)
        knots = rng.standard_normal(SR // 2)
        db = db + ripple_db * np.interp(hz / ripple_hz, np.arange(len(knots)), knots)
        turn = np.arccos(np.clip(along(ALIKE, hz), -1, 1)) / 2  # mid/side split
        return amp(db) * [np.cos(turn), np.sin(turn)]
    mid, side = filtered(rng.standard_normal((2, size)), colour)
    return unit(np.array([mid + side, mid - side]))


def patchy(x, depth_db):
    """Narrow bands of x swell and fade by chance; rms 1."""
    bands = signal.stft(x, nperseg=1024)[2]
    field = uniform_filter1d(rng.standard_normal(bands.shape[1:]), 3, 0)  # over frequency
    field = uniform_filter1d(field, 6, 1)  # over time
    return unit(signal.istft(bands * amp(depth_db * unit(field)), nperseg=1024)[1][:, :N])


def scene():
    """Sum of all sources, winch first."""
    winch = lowering() + lifting() + contactor()
    plow = blade() + cable() + springs() + scraping()
    return winch + plow + jacket() + wind()


# two microphone ports, balance: [f/Hz, left re right level/dB]
BALANCE = [(100, -0.5), (280, 0), (430, 3.5), (750, 1.5), (1050, 2.5), (1600, -1), (3000, 3), (4100, 1.5),
           (5200, 4), (6500, 3), (8500, 0)]
# two microphone ports, phase: [f/Hz, left lead/rad]
PORT_PHASE = [(800, 0), (1350, -.5), (2400, .25), (4000, .1), (8600, 0), (10200, -3.1), (11300, -5.1),
              (12000, -5.6)]
TOP_HZ = 15900


def record(dry):
    """Ports resonate at different pitches, so treble phases part; loud peaks round off; then the band limit."""
    side = np.array([[0.5], [-0.5]])

    def port_response(hz):
        return amp(side * along(BALANCE, hz)) * np.exp(1j * side * along(PORT_PHASE, hz))
    ports = filtered(dry, port_response)
    rounded = ports / (1 + (ports / 0.93) ** 4) ** 0.25
    return filtered(rounded, lambda hz: hz < TOP_HZ)


dry = scene()
out = record(dry)
inscribe(out)
```